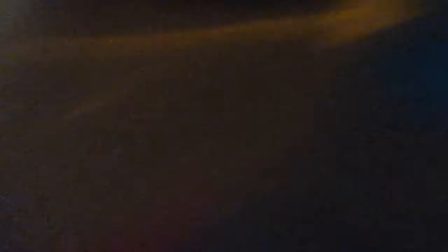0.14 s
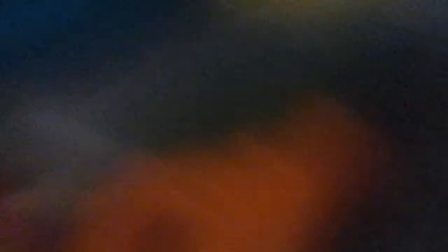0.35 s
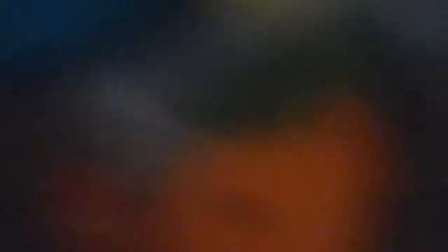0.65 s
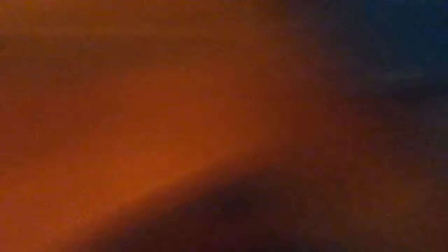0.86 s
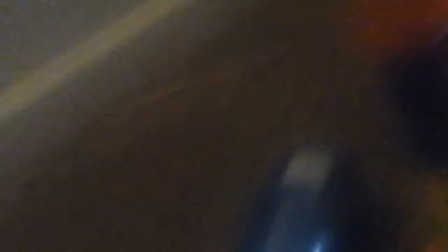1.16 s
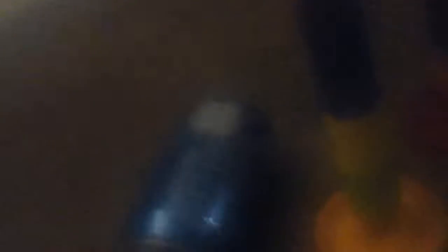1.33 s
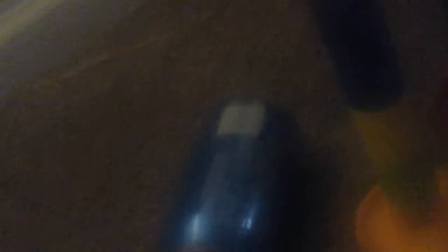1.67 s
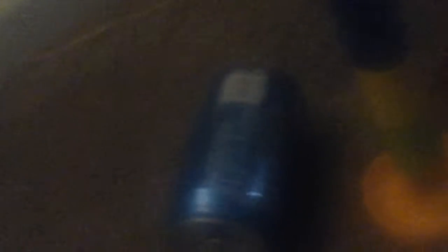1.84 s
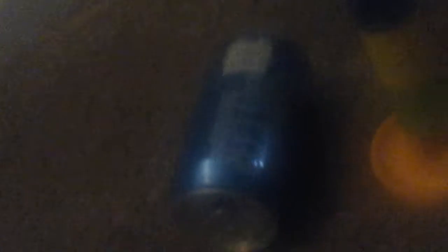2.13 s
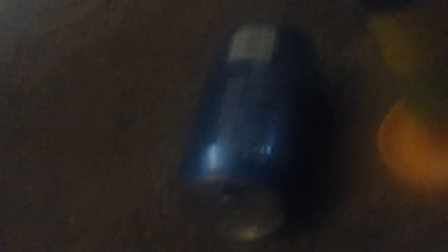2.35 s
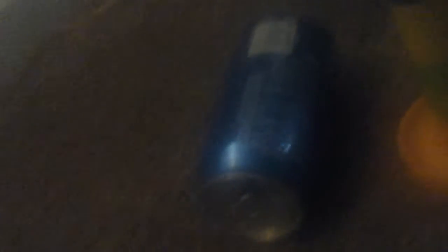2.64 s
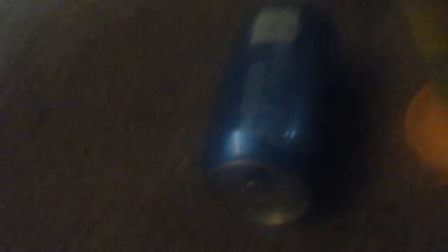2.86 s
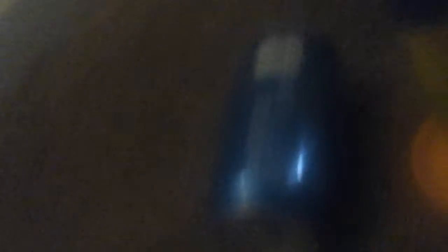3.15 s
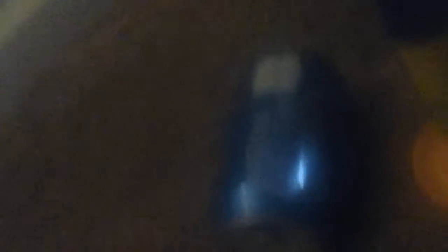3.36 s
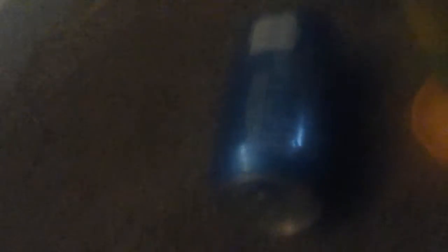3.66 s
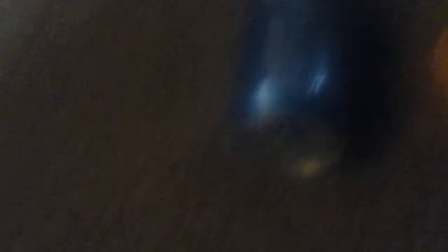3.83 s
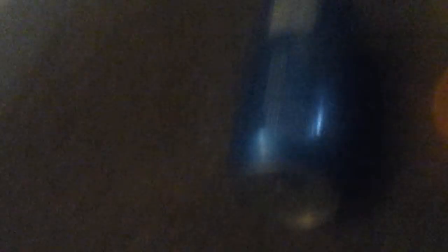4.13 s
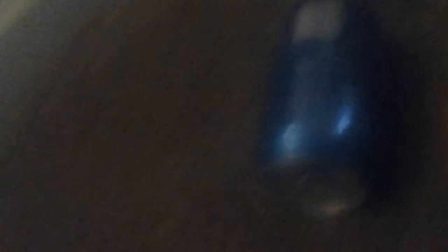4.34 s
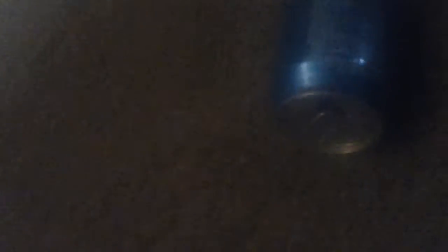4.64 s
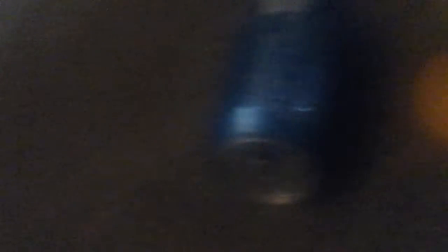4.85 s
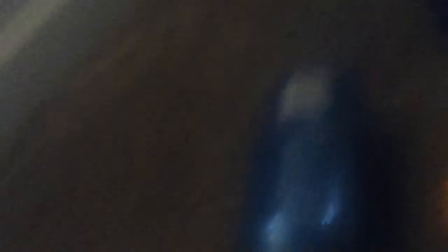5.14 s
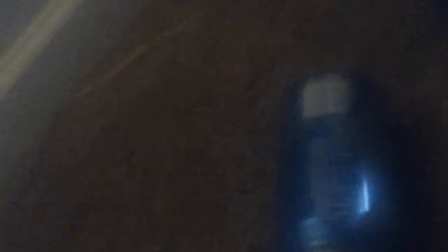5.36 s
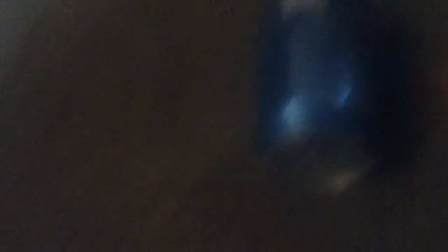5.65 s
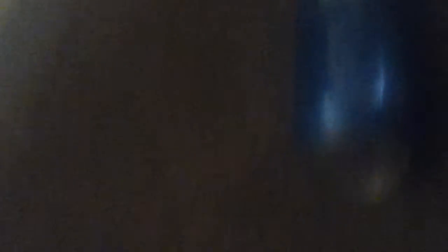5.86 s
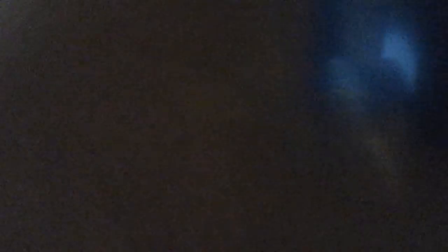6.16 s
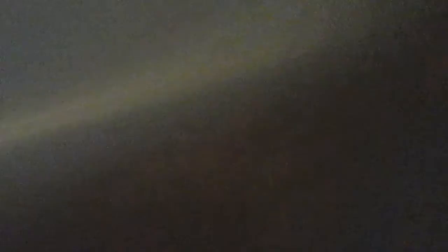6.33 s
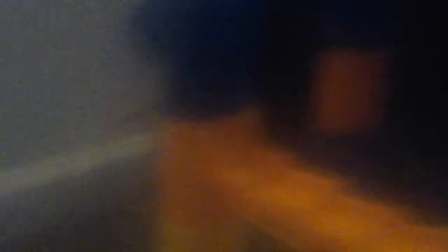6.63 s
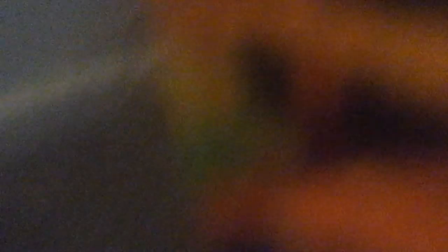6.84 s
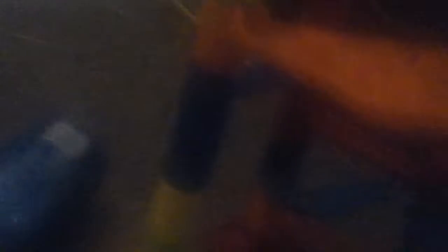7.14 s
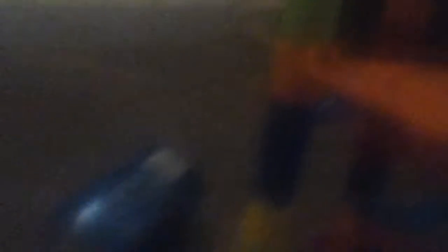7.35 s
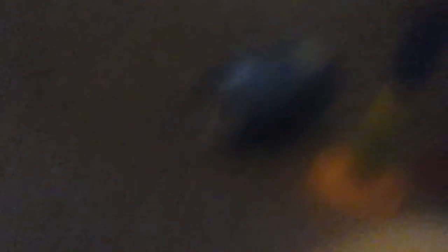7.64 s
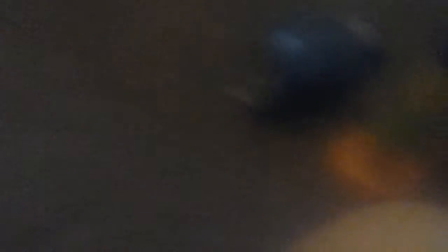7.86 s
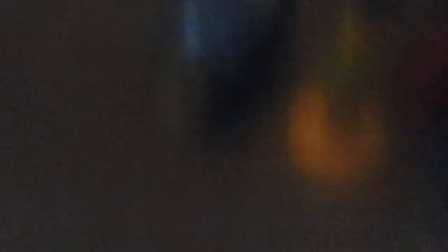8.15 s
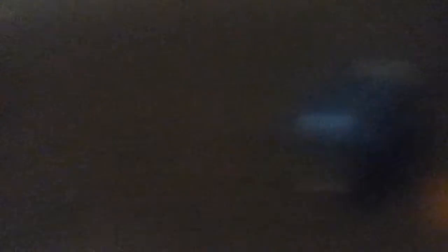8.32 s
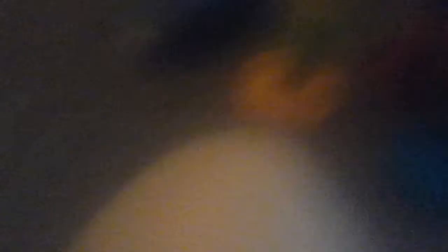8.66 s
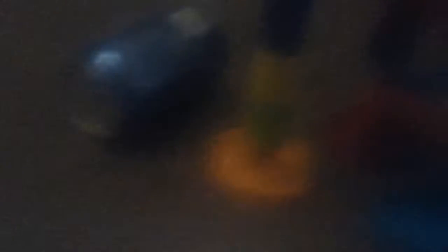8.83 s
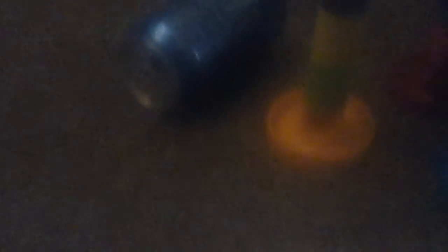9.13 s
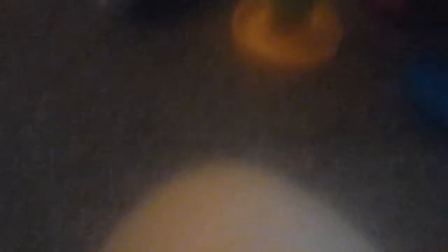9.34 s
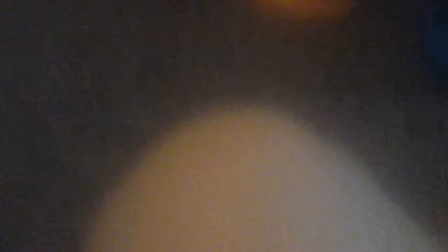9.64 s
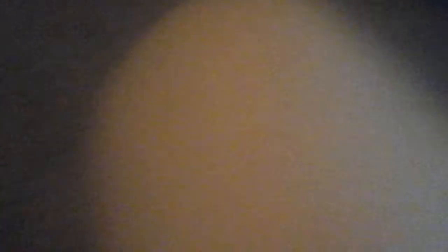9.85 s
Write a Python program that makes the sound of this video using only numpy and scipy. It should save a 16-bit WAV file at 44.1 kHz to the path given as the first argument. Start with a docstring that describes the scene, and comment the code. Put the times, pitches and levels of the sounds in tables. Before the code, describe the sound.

Marbles strike a hard plastic marble run close to a hand-held phone in a small carpeted room, with a short roomy tail. Brief rolling rattle opens it, then a fast cluster of bright, ringing clicks at 0.27-0.5 s. After a gap, a loud crack lands at 1.3 s, with bounces to 1.6 and another clear knock near 1.86. A tube rattle swells around 2-2.3 s, followed by fainter, duller knocks and small rolls until a sharp clack at 4.2. Sparse ticks lead to a hard double knock at 5.44, then a short falling hum and rattle. Clicks and swelling rolling build from 6.2 to the hardest crack at 6.53, leaving a faint curve hum. From 7.5 to 8.6 s fingers softly brush and tap the case, hissiest near 8.4; sparse tiny taps continue, with a faint brush at the end, over quiet hiss, rumble and household hum.

```python
"""Marble run in a small carpeted room

Marbles knock and bounce through a hard plastic marble run, close to the microphone of a hand-held phone.
Each knock is a noise crack with decaying modes and paired rings; random tiny contacts make the rolling.
A narrow gliding hum follows a marble round a curve; noise echoes answer the knocks from the room.
Fingers brush and tap the case near the end, over soft hiss, low rumble and a faint household hum."""
import sys
import numpy as np
from scipy import signal
from scipy.fft import rfft, irfft
from scipy.io import wavfile

SR = 44100
rng = np.random.default_rng(int(sys.argv[2]) if len(sys.argv) > 2 else 0)


def output_pcm(signal):
    """Save a mono or channel-first signal as 16-bit PCM at the path in sys.argv[1].

    Samples are clipped to [-1, 1] before scaling.
    """
    pcm = np.clip(np.atleast_2d(signal).T, -1, 1) * 32767
    wavfile.write(sys.argv[1], SR, np.round(pcm).astype(np.int16))


N = 440559
T = np.arange(N) / SR  # seconds


def undb(db):
    """Decibels to gain."""
    return 10 ** (np.asarray(db) / 20)


def unit(x):
    """Scale to rms 1."""
    return x / np.sqrt(np.mean(x ** 2) + 1e-30)


def add(out, start_s, x):
    """Mix x into out from a start time."""
    i = max(int(start_s * SR), 0)
    out[i:i + len(x)] += x[:len(out) - i]


def colour(x, points):
    """Shape x with a spectrum of (Hz, dB) points, sloping away beyond both ends, at rms 1."""
    hz, db = np.transpose(points)
    f = np.fft.rfftfreq(len(x), 1 / SR) + 1
    skirts = np.minimum(f / hz[0], 1) ** 2 * np.minimum(hz[-1] / f, 1) ** 2
    gain = undb(np.interp(np.log(f), np.log(hz), db)) * skirts
    return unit(irfft(rfft(x) * gain, len(x)))


def resonate(x, modes):
    """Ring (Hz, nominal width, dB) resonances with x; two passes keep the valleys dark."""
    out = 0
    for hz, width, db in modes:
        b, a = signal.iirpeak(hz, hz / (0.71 * width), fs=SR)
        ring = signal.lfilter(b, a, signal.lfilter(b, a, x))
        out = out + undb(db) * unit(ring)
    return unit(out)


def swell(start_s, length_s, swell_db, attack_s, release_s):
    """Attack, an even rise or fall in dB, release."""
    edges = np.clip((T - start_s) / attack_s, 0, 1) * np.clip((start_s + length_s - T) / release_s, 0, 1)
    progress = np.clip((T - start_s) / length_s, 0, 1)
    return edges * undb(swell_db * (progress - .5))


def gains(rows, attack_s, release_s):
    """Gain curves of the high and the low part of a motion, summed over its stretches."""
    curves = 0
    for start_s, length_s, high_db, low_db, swell_db in rows:
        shape = swell(start_s, length_s, swell_db, attack_s, release_s)
        curves = curves + undb([[high_db], [low_db]]) * shape
    return curves


def grains(per_s, spread_db):
    """Dense tiny contacts of uneven size."""
    present = rng.random(N) < per_s / SR
    return present * rng.standard_normal(N) * undb(spread_db * rng.standard_normal(N))


def walk(per_s):
    """Slow random wander of spread near 1, through a number of new values each second."""
    return 1.2 * np.interp(T * per_s, np.arange(400), rng.standard_normal(400))


def fade(t, t60):
    """Exponential decay by 60 dB in t60 seconds."""
    return np.exp(-np.log(1000) * t / np.maximum(t60, .002))


# Frequency registers at the microphone: boom, thud, body, clack, bright, tick. Each entry: an edge in Hz.
REGISTER_EDGES = [80, 200, 750, 1700, 3400, 5700, 14500]
BANDS = [signal.butter(4, edges, "band", fs=SR, output="sos") for edges in zip(REGISTER_EDGES, REGISTER_EDGES[1:])]


def voice(blow, levels_db):
    """Where a part is struck decides how strongly each register speaks (rms over a hundredth of a second)."""
    out = 0
    for band, db in zip(BANDS, levels_db):
        part = signal.sosfilt(band, blow)
        out = out + part * undb(db) / np.sqrt(np.sum(part ** 2) / (SR / 100))
    return out


# Hiss of the quiet room. Each row: frequency in Hz, relative level in dB.
AIR_COLOUR = [(200, -16), (360, -12.5), (480, -8), (760, -11.5), (1050, -13.5), (1450, -15.5), (3200, -16),
              (3900, -13), (4650, -8), (5200, -11.5), (6100, -20.5), (9000, -21.5), (15000, -23)]
# Its loudness at the microphone. Each row: time in seconds, level in dB.
AIR_LEVEL = [(0, -60), (1.1, -70), (2.3, -63.5), (3.6, -72), (7, -63), (10, -73)]
# Low rumble of the room and the hand. Each row: frequency in Hz, relative level in dB.
RUMBLE_COLOUR = [(25, -27), (40, -22.5), (52, -6.5), (66, 4), (90, -1.5), (120, -2.5), (160, -12),
                 (220, -7.5)]
# Its loudness at the microphone. Each row: time in seconds, level in dB.
RUMBLE_LEVEL = [(0, -62.5), (1.2, -71), (2.5, -66.5), (4.9, -72.5), (5.45, -59), (5.8, -74), (6.5, -62.5),
                (7, -68.5), (8.3, -69.5), (9.3, -76.5), (10, -71.5)]
# Hum of an appliance. Each row: centre frequency in Hz, level in dB before trim and wander.
APPLIANCE_HUM = [(231.5, -86), (931.3, -84.5), (1104, -85.5)]
# A soft whine of the room. Each row: frequency in Hz, nominal width in Hz, relative level in dB.
ROOM_WHINE = [(3767, 40, 0)]


def background(hum_trim_db=-1.5, whine_db=-82, waver_hz=2):
    """Noise coloured as hiss and rumble, a narrow resonant whine, and hum tones wavering in pitch and level."""
    air = colour(rng.standard_normal(N), AIR_COLOUR) * undb(np.interp(T, *np.transpose(AIR_LEVEL)))
    low = colour(rng.standard_normal(N), RUMBLE_COLOUR) * undb(np.interp(T, *np.transpose(RUMBLE_LEVEL)))
    hum = 0
    for hz, db in APPLIANCE_HUM:
        level = undb(db + hum_trim_db + 2 * walk(4.6))
        phase = 2 * np.pi * np.cumsum(hz + waver_hz * walk(31)) / SR
        hum = hum + level * np.sin(phase)
    whine = undb(whine_db) * resonate(rng.standard_normal(N), ROOM_WHINE)
    return air + low + np.sqrt(2) * hum + whine


# Marbles on the open chutes, close by; the first row, at 0 s, is instead the fading tail of a knock struck just
# before. Each row: start in seconds, length in seconds, # rattle in dB and rumble in dB (both before trim),
# swell over the stretch in dB.
CHUTE_ROLLS = [(0, 0.068, -66, -57, -19), (.04, 0.3, -79, -66.5, -2), (.29, 0.18, -58.5, -63.5, 9),
               (.52, .15, -63.5, -71.5, -19), (.72, 0.15, -65, -67, 3), (2.42, 0.15, -61, -56, 10),
               (2.62, 0.23, -80, -73.5, 2), (3.2, 0.15, -72, -77.5, 4), (3.83, 0.11, -64.5, -68, 2),
               (4.16, 0.076, -67, -66.5, 9), (5.42, 0.13, -54, -51, -15), (6.35, 0.19, -53, -56.5, 17),
               (9.84, 0.21, -66.5, -75.5, 5)]
# A marble running through a tube. Each row: start in seconds, length in seconds,
# rattle in dB and rumble in dB (both before trim), swell over the stretch in dB.
TUBE_RUNS = [(1.99, 0.313, -56.5, -59.5, 16), (5.52, 0.172, -56.5, -59.5, 11)]
# Resonances of a chute under a rolling marble. Each row: frequency in Hz, nominal width in Hz, relative level in dB.
CHUTE_MODES = [(2310, 440, -3), (3870, 410, -1), (4600, 930, 7), (5005, 350, -5)]
# Resonances of the tube. Each row: frequency in Hz, nominal width in Hz, relative level in dB.
TUBE_MODES = [(2300, 580, -4), (4020, 370, -2.5), (4680, 1400, -4), (6200, 130, -12)]
# Low resonances of the chutes. Each row: frequency in Hz, nominal width in Hz, relative level in dB.
CHUTE_LOW_MODES = [(283, 140, -2.5), (493, 210, -2.5), (1100, 450, -2.5)]
ROLL_ATTACK_S, ROLL_RELEASE_S = .02, 0.051


def rolling(stretches, resonances, rattle_trim_db, rumble_trim_db):
    """Marbles chatter over the grain of the plastic: random contacts of wandering strength ring the resonances."""
    rattle, rumble = gains(stretches, ROLL_ATTACK_S, ROLL_RELEASE_S)
    contacts = grains(per_s=1800, spread_db=-4) * undb(walk(30))
    high = undb(rattle_trim_db) * rattle * resonate(contacts, resonances)
    low = undb(rumble_trim_db) * rumble * resonate(contacts, CHUTE_LOW_MODES)
    return high + low


# Faint stray touches early in the run: latest start in seconds, middle level and largest departure in dB.
STRAY_END_S, STRAY_DB, STRAY_SPREAD_DB = 3.7, -73.5, 10.5


def strays(count=12, body_db=-6, clack_db=-6, tick_db=-12, hollow_hz=1100, bright_hz=4600, ring_db=-3):
    """Faint knocks at random moments, each on a slightly different part."""
    rows = []
    for when, size, part in rng.random((count, 3)):
        level_db = STRAY_DB + STRAY_SPREAD_DB * (2 * size - 1)
        hollow, bright = hollow_hz * 2 ** (part - .5), bright_hz * (1 + 0.12 * (part - .5))
        rows.append((STRAY_END_S * when, level_db, body_db, clack_db, tick_db, hollow, bright, ring_db))
    return rows


# Deep modes of the whole tower. Each row: frequency in Hz, width in Hz (not played), relative level in dB.
TOWER_MODES = [(250, 25, -21), (321, 30, -12.5), (593, 30, -16.5), (941, 30, -8), (1280, 30, -8),
               (2506, 30, -8.5)]
# Modes of the plastic parts. Each row: frequency in Hz, width in Hz (not played), relative level in dB.
PLASTIC_MODES = [(272.5, 110, -20.5), (494.2, 27, -15), (1026, 78, -12), (1452, 43, -10), (1708, 34, -9.5),
                 (2017, 50, -3), (2277, 79, -5), (3090, 78, -8), (3758, 67, -14), (4720, 24, -2),
                 (4920, 89, -0.5), (5264, 66, -7)]
# Short treble overtones of the parts. Each row: frequency in Hz, width in Hz (not played), relative level in dB.
PLASTIC_OVERTONES = [(6350, 60, -16.5), (6680, 60, -16), (7350, 80, -19.5), (7700, 80, -18.5),
                     (9000, 90, -19.5), (12680, 90, -26), (13900, 90, -23.5)]


def struck_modes(t, mode_t60=0.049, scatter_db=3):
    """The struck plastic's modes, each blow with its own balance, slight detuning and phases."""
    hz, _, mode_db = np.vstack([TOWER_MODES, PLASTIC_MODES, PLASTIC_OVERTONES]).T
    size, detune, turn = rng.standard_normal((3, len(hz), 1))
    swing = np.sin(2 * np.pi * (hz[:, None] * (1 + 0.0094 * detune) * t + turn))
    weight = unit(undb(mode_db[:, None] + scatter_db * size)) / np.sqrt(len(hz) / 2)
    decay = fade(t, mode_t60 * (hz[:, None] / 2000) ** -.3)  # low modes last longer
    return np.sum(weight * swing * decay, axis=0)


# Weak upper partials of the bright ring. Each entry: ratio to its pitch.
UPPER_RATIOS = (2.3, 2.93)
RING_T60_S, RING_SPLIT = 0.031, 0.018  # decay when ring and crack are equal; split as a share of pitch
RING_SHORTENING = 0.13  # dB per dB: a strongly ringing part radiates its energy away sooner


def struck_rings(t, body_db, hollow_hz, bright_hz, ring_db,
                 hollow_db=-4, hollow_share=0.42, bright_db=-2, twin_db=-12, upper_db=-34):
    """Hollow and bright rings of the struck part, each a close pair; more body rings more hollow."""
    partials = [(hollow_hz, hollow_db + hollow_share * body_db), (bright_hz, bright_db)]
    partials += [(ratio * bright_hz, upper_db) for ratio in UPPER_RATIOS]
    rings = 0
    for hz, db in partials:
        twin = undb(twin_db) * np.sin(2 * np.pi * hz * (1 + RING_SPLIT) * t)
        rings = rings + undb(db) * (np.sin(2 * np.pi * hz * t) + twin)
    decay = fade(t, RING_T60_S * undb(-RING_SHORTENING * ring_db))
    return np.sqrt(2) * undb(ring_db) * rings * decay


# Marble on plastic, close by. Each row: start in seconds, level of the bright register in dB,
# then body, clack and tick in dB relative to it, hollow pitch in Hz, bright pitch in Hz,
# and level of these two rings over the crack in dB, before their own trims.
KNOCKS = [(0.2722, -32.5, -31, -15, -10, 1690, 4540, 4), (.278, -32, -25, -18, -6, 1210, 4920, 20),
          (0.2864, -30, -59, -18.5, -12.5, 1710, 4710, -1), (.316, -41.5, -27, -25, -11, 1410, 4720, 8),
          (0.414, -27, -13.5, -5, -8, 1220, 4190, 15), (0.4224, -27, -15.5, -7.5, -20, 1630, 4640, -2),
          (0.4325, -26.5, -16.5, -3, -4, 1060, 4280, 24), (.441, -33, -14, -4, -10, 1315, 3960, 6),
          (0.449, -26.5, -57, -22, -15.5, 1040, 4940, 8), (.462, -34.5, -22, -23, -18, 1020, 4740, 13),
          (0.5117, -38.5, -17, -10, -13.5, 1350, 4270, 9),
          (1.313, -18.5, -18.5, -15, -13.5, 1610, 5250, -3.5), (1.3233, -32, -2, -0.5, -24, 1360, 4460, -1),
          (1.339, -26, -21.5, -16, -37, 920, 4510, 14), (1.4322, -38.5, -17, -16, -14, 940, 4860, -4),
          (1.4724, -35, -10.5, -5, -14, 930, 4500, 11), (1.5715, -27.5, -21, -13.5, -15.5, 1240, 4590, 15),
          (1.7957, -46, -7.5, -8, -21, 990, 4580, -9), (1.804, -45, -10, -10, -13, 1100, 4250, 0),
          (1.858, -28.5, -14.5, -16.5, -12, 960, 4660, 2), (1.974, -44.5, -13, -5, -11, 1480, 4510, -1),
          (1.986, -43.5, -10, -6.5, -11.5, 960, 3980, -12), (2.2178, -51, 1, -6, -25, 1660, 4230, -6),
          (2.228, -41.5, -13, -10, -33, 1040, 4650, 4), (2.248, -40.5, -5, -6, -15, 1270, 4020, 4),
          (2.3907, -51, -10, -9.5, -15, 1290, 4700, -3), (2.3941, -37.5, -17.5, -12, -14.5, 1300, 4920, 6),
          (2.4615, -53, 8.5, 4, -16, 1290, 4500, -10), (2.498, -38.5, -3.5, 6, -13.5, 1280, 4130, -2),
          (2.509, -42.5, -0.5, 3, -15, 1315, 4700, 5), (2.517, -53.5, 13, -1, -15, 1680, 4750, -3),
          (2.628, -46, -11, -6, -16, 1300, 4380, 0), (2.797, -69, 6.5, 2, -2, 970, 5200, -2),
          (2.834, -60.5, -13, -2, -20, 820, 4500, -9), (2.9229, -40.5, -11.5, -3.5, -17.5, 1470, 4550, -3),
          (3.1865, -54, -4, -5, -16, 1257, 4600, 3), (3.269, -55.5, -12, -10, -9, 1140, 4720, 5.5),
          (3.614, -46.5, -17, -6.5, -6, 1280, 3940, -6), (3.66, -51, 2, 5, -12, 872, 4740, 1.5),
          (3.886, -59, 0, -2.5, -14, 947, 4520, -2.5), (4.094, -51.5, -2, -2.5, -19, 1060, 4850, -4),
          (4.215, -40.5, -2.5, -13, -15, 1200, 4860, -1), (4.2185, -23.5, -11.5, -7.5, -7.5, 886, 4890, -2),
          (4.2229, -45.5, 4, 9.5, -17, 542, 4860, 2), (4.377, -60, -5, -10, -16, 1140, 4700, -3),
          (4.469, -61.5, -15, -13, -10, 936, 4240, 1), (4.787, -58, -14, -7, -5, 1250, 4730, 4),
          (4.799, -50.5, -17.5, -4, -12, 956, 4660, -5), (4.9498, -45.5, -12, -7.5, -15, 1360, 4530, 8),
          (5.1824, -47, -3.5, -6.5, -19, 970, 4700, -6.5), (5.2413, -42.5, -9, -6.5, -21, 1290, 4700, 2.5),
          (5.257, -51, -4, -8, -12, 1690, 4180, -9), (5.283, -47, -7.5, -11, -13, 1380, 5010, 1),
          (5.4032, -52.5, 1, 3.5, -12, 1600, 5000, -6), (5.415, -46, -26, -14, -20, 1130, 4420, -11),
          (5.436, -27.5, -11.5, -6.5, -9, 1220, 4430, 3), (5.4395, -23.5, -13.5, -11, -2, 1100, 3936, 11.5),
          (5.4552, -34.5, -8, -4, -22, 934, 4250, 15), (5.6172, -50.5, -21, -19, -9, 1320, 4400, 7),
          (5.67, -55, -2, -7, -2, 917, 4900, 1), (5.831, -45, -10.5, -6.5, -8.5, 1710, 5000, -17),
          (5.973, -55, -20, -13, -7.5, 744, 4540, -8), (6.0087, -54, -4, -4, -22, 1320, 3510, 29),
          (6.0849, -64, -21.5, -10, -3, 970, 5080, 4), (6.168, -53.5, -35, -32, -24, 950, 4660, 3),
          (6.2136, -36, -20, -27, -6, 955, 4660, 4), (6.2216, -37.5, -18.5, -37, -5, 920, 5310, 5),
          (6.248, -57.5, 7.5, 1, -14, 910, 5450, 3), (6.265, -32, -14.5, -8, -11, 1360, 4870, 1),
          (6.3476, -43, -12, -9.5, -17, 1680, 4360, -7.5), (6.401, -41.5, -25, -2.5, -3.5, 1710, 3290, 10),
          (6.4825, -43.5, 15, -4, -6, 1080, 3500, -7.5), (6.5311, -15, -11.5, -18, -10, 1460, 5090, -1.5),
          (6.5344, -22, -8.5, -7.5, -31, 1660, 4800, 4), (6.559, -27, -9, -12, -22, 1090, 4690, 2),
          (8.938, -78, 12, -7, -3.5, 910, 4760, 6), (9.16, -69.5, 2.5, -10, -12.5, 1043, 4540, -3)]
# Colour of the contact crack. Each row: frequency in Hz, relative level in dB.
CRACK_COLOUR = [(71, -54), (120, -9), (499, -11.5), (715, -20), (910, -2.5), (1560, -6), (1660, -9),
                (2030, -4.5), (2480, -8), (2690, -0.5), (3290, -9), (4440, 0.5), (5210, -8.5), (7330, -18),
                (14500, -32)]
# a blow with more body also thuds more and spreads less of its sound into the room
THUD_DB, THUD_PER_BODY, BOOM_DB = -9, 0.58, -13.5  # boom is relative to thud
ECHO_DB, ECHO_PER_BODY = -2.5, -0.16
# a harder blow has a shorter contact: it starts faster and its thud grows less than its crack
USUAL_BLOW_DB, THUD_LOSS_PER_DB, CONTACT_LOSS_PER_DB = -42, 0.298, 0.3
RING_DRYNESS = 0.19  # dB per dB: a strongly ringing part is heard more directly


def knocks(crack_t60=0.049, snap_t60=0.0042, snap_db=4, modes_db=-2, rise_s=0.0009):
    """A knock is a snap and a crack, the plastic's modes, and the rings of the part that was struck."""
    t = T[:SR // 8]
    for start_s, db, body, clack, tick, hollow_hz, bright_hz, ring_db in KNOCKS + strays():
        envelope = fade(t, crack_t60) + undb(snap_db) * fade(t, snap_t60)
        crack = colour(rng.standard_normal(len(t)), CRACK_COLOUR) * envelope
        blow = crack + undb(modes_db) * struck_modes(t) + struck_rings(t, body, hollow_hz, bright_hz, ring_db)
        hard_db = db - USUAL_BLOW_DB
        # the plastic gives a little before it pushes back
        contact = 1 - np.exp(-t / rise_s * undb(CONTACT_LOSS_PER_DB * hard_db))
        thud = THUD_DB + THUD_PER_BODY * body - THUD_LOSS_PER_DB * hard_db
        levels_db = db + np.array([thud + BOOM_DB, thud, body, clack, 0, tick])
        room_db = ECHO_DB + ECHO_PER_BODY * body - RING_DRYNESS * max(ring_db, 0)
        yield start_s, voice(blow * contact, levels_db), room_db


# Echo of the small room, one row a register from boom to tick. Each row: decay by 60 dB in seconds, level in dB.
ROOM_DECAY = [(0.61, -0.5), (.45, -5), (.28, -7), (0.35, -8.5), (.34, -12.5), (0.35, -11)]


def room(x, first_s=0.0019, build_s=0.0027):
    """Nearby surfaces answer with scattered echoes that thicken into a short tail."""
    t = T[:SR // 2]
    onset = 1 - np.exp(-np.maximum(t - first_s, 0) / build_s)
    response = 0
    for band, (t60, db) in zip(BANDS, ROOM_DECAY):
        echoes = rng.standard_normal(len(t)) * (rng.random(len(t)) < .03 + 4 * t)
        even = echoes / np.sqrt(0.023 + 4 * t)  # offsets the growing density
        tail = signal.sosfilt(band, even * onset * fade(t, t60))
        passed = np.sum(signal.sosfilt(band, signal.unit_impulse(len(t))) ** 2)
        response = response + undb(db) * tail * np.sqrt(passed / np.sum(tail ** 2))
    return signal.fftconvolve(x, response)[:N]


# A marble circling a curve, close by. Each row: start in seconds, length in seconds,
# first pitch in Hz, last pitch in Hz, level in dB, swell over the stretch in dB.
CIRCLES = [(5.561, .1, 231.7, 176, -52, 17), (6.38, .12, 125, 111, -54, 0), (6.413, .1, 416, 487, -59, 3.5),
           (6.577, .5, 480, 418, -71, -10.5)]


def circling(width_hz=45):
    """A rough, narrow hum that glides with the marble's speed: slow noise carried on a moving pitch."""
    out = 0
    smooth = signal.butter(2, width_hz, fs=SR, output="sos")
    for start_s, length_s, first_hz, last_hz, db, swell_db in CIRCLES:
        rough = unit(signal.sosfilt(smooth, rng.standard_normal((2, N))))
        pitch = np.interp(T, [start_s, start_s + length_s], [first_hz, last_hz])
        phase = 2 * np.pi * np.cumsum(pitch) / SR
        loudness = undb(db) * swell(start_s, length_s, swell_db, ROLL_ATTACK_S, ROLL_RELEASE_S)
        out = out + loudness * (rough[0] * np.cos(phase) + rough[1] * np.sin(phase))
    return out


# Fingers sliding on the case, right at the microphone. Each row: start in seconds, length in seconds,
# hiss in dB and rub in dB (both before trim), swell over the stroke in dB.
STROKES = [(7.52, 0.18, -54.5, -62.5, -3.5), (7.67, 0.22, -64, -60, 9), (7.83, 0.14, -57, -61, 10),
           (8.14, 0.24, -56, -60.5, -1), (8.37, 0.13, -46.5, -56, 5), (9.88, .2, -61.5, -76, 3)]
# Colour of the sliding hiss. Each row: frequency in Hz, relative level in dB.
HISS_COLOUR = [(880, -37.5), (1500, -24.5), (2290, -15), (2610, -5), (3320, -12), (4690, -1), (5960, -7.5),
               (12500, -8.5), (14200, -14), (14800, -31)]
# Colour of the low rub. Each row: frequency in Hz, relative level in dB.
RUB_COLOUR = [(88, -39.5), (150, -2.5), (771, -8.5), (926, -2.5), (978, -11.5), (2000, -12.5), (2600, -31),
              (4400, -120)]
# Fingers tapping the case. Each row: start in seconds, level of the bright register in dB before trim,
# tick level in dB relative to it.
TAPS = [(7.5608, -58, 2), (7.856, -59.5, -7), (8.0151, -66, -3), (8.099, -61, -0.5), (8.149, -52, -6),
        (8.191, -65, 7), (8.413, -52.5, 1), (8.585, -66, -0.5), (8.736, -62, -2), (9.035, -66, -0.5),
        (9.063, -64, -1.5), (9.236, -57, -5.5), (9.902, -60, -19), (9.964, -58, 2)]
STROKE_ATTACK_S, STROKE_RELEASE_S = 0.046, 0.11


def fingers(hiss_trim_db=-1, rub_trim_db=-2, tap_trim_db=-1, tap_t60=0.021, boom_db=-20, thud_db=-13, clack_db=-14):
    """Skin sticks and slips on the case as dense random contacts, and taps it with short noise bursts."""
    hiss, rub = gains(STROKES, STROKE_ATTACK_S, STROKE_RELEASE_S)
    out = undb(hiss_trim_db + 1.7 * walk(35)) * hiss * colour(grains(per_s=8000, spread_db=-4.5), HISS_COLOUR)
    out += undb(rub_trim_db) * rub * colour(grains(per_s=1600, spread_db=-0.5), RUB_COLOUR)
    t = T[:SR // 10]
    for start_s, db, tick in TAPS:
        tap = rng.standard_normal(len(t)) * fade(t, tap_t60)
        # body and clack share one level
        levels_db = tap_trim_db + db + np.array([boom_db, thud_db, clack_db, clack_db, 0, tick])
        add(out, start_s, voice(tap, levels_db))
    return out


def scene():
    """The run and its echo, the hand and the room tone, all heard in the centre."""
    direct, to_room = np.zeros(N), np.zeros(N)
    for start_s, knock, room_db in knocks():
        add(direct, start_s, knock)
        add(to_room, start_s, knock * undb(room_db))
    chutes = rolling(CHUTE_ROLLS, CHUTE_MODES, rattle_trim_db=3.5, rumble_trim_db=1)
    tubes = rolling(TUBE_RUNS, TUBE_MODES, rattle_trim_db=1, rumble_trim_db=-5)
    run = undb(-1) * direct + room(to_room) + chutes + tubes + circling()
    mono = run + fingers() + background()
    return np.array([mono, mono])


def record(dry, top_hz=14900):
    """The phone cuts the top steeply, with an elliptic low-pass."""
    return signal.sosfilt(signal.ellip(10, .2, 80, top_hz, fs=SR, output="sos"), dry)


dry = scene()
out = record(dry)
output_pcm(out)
```